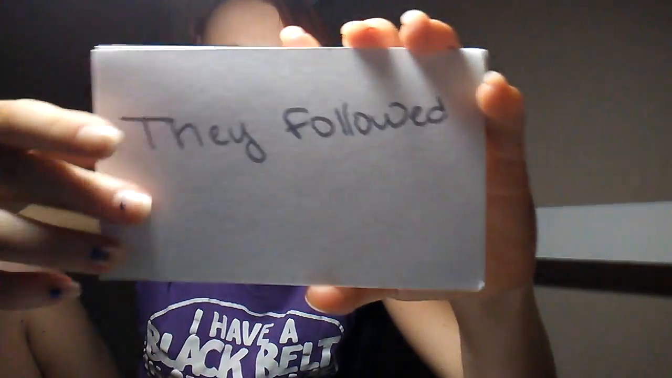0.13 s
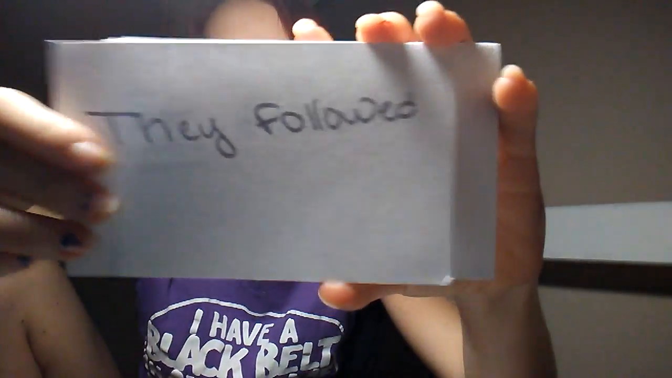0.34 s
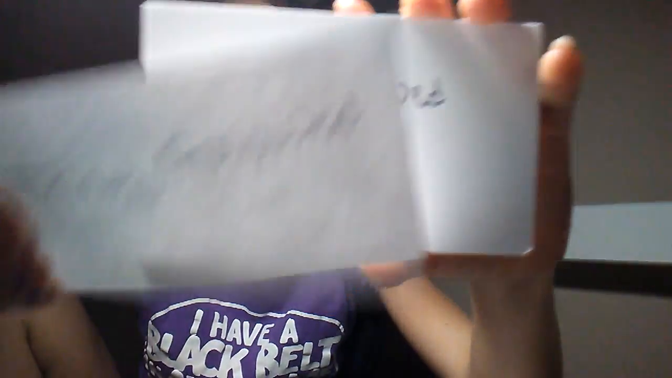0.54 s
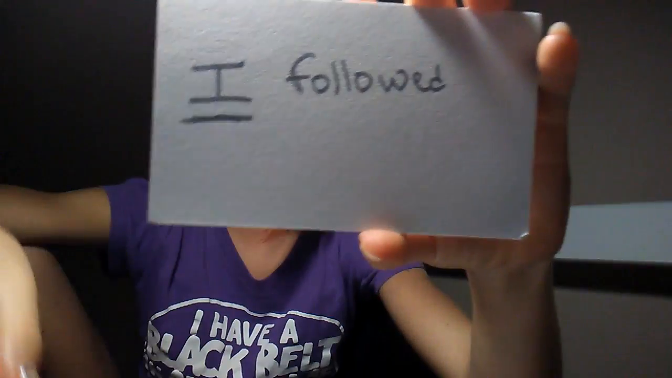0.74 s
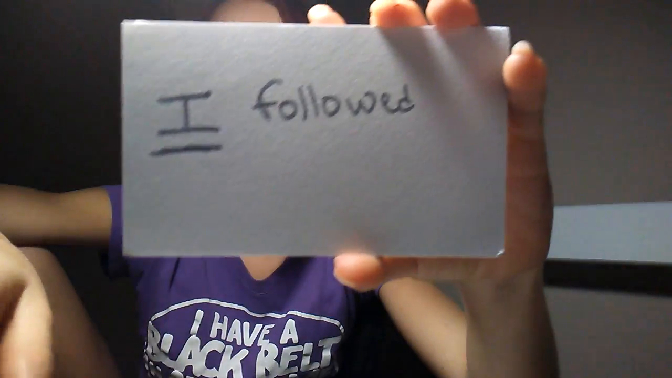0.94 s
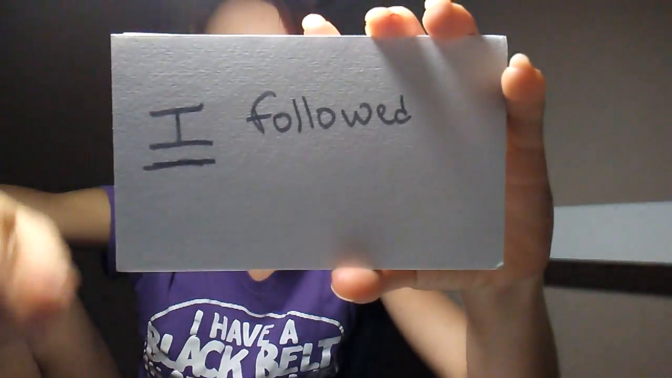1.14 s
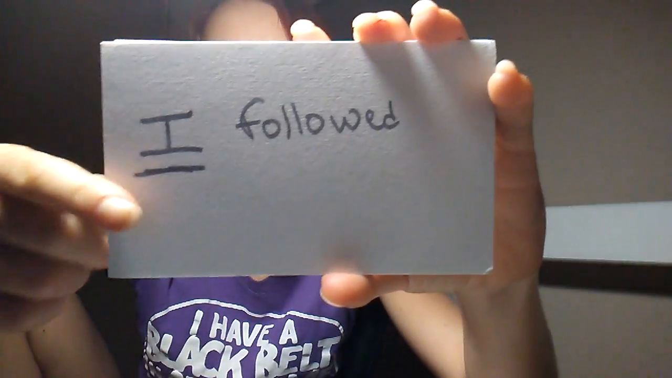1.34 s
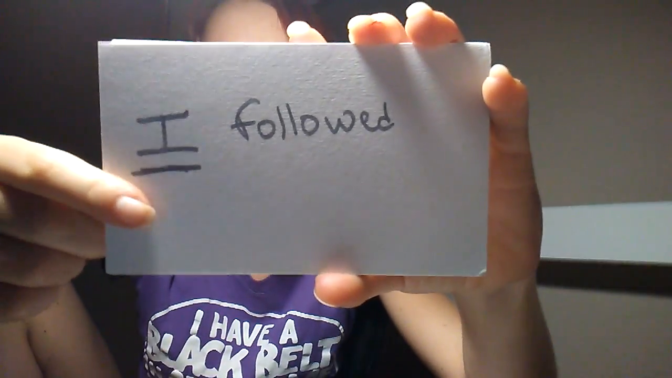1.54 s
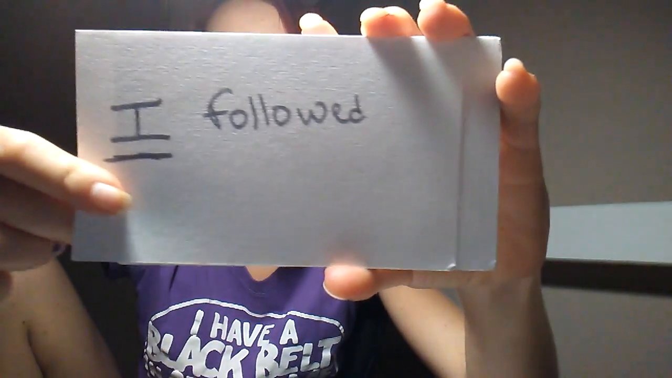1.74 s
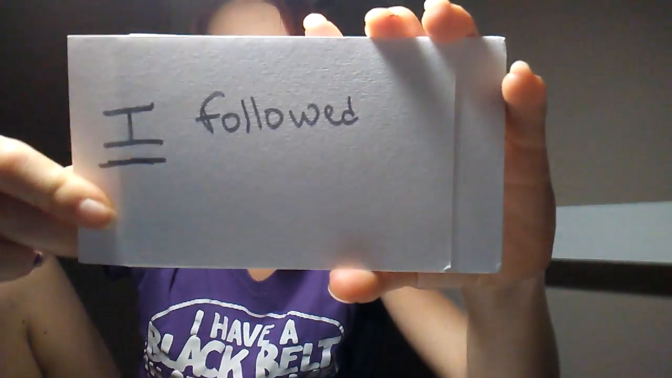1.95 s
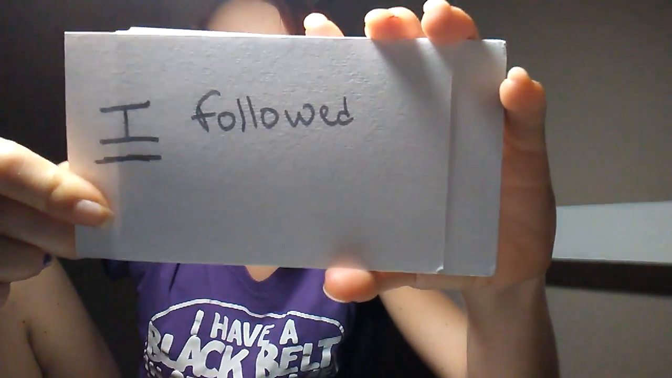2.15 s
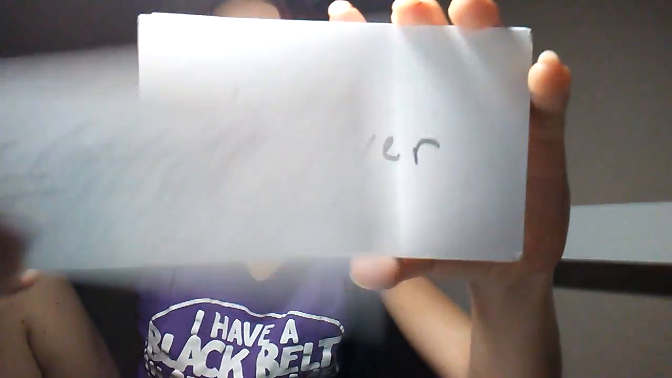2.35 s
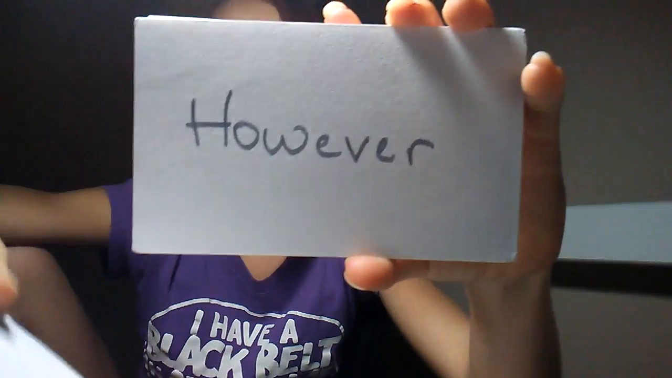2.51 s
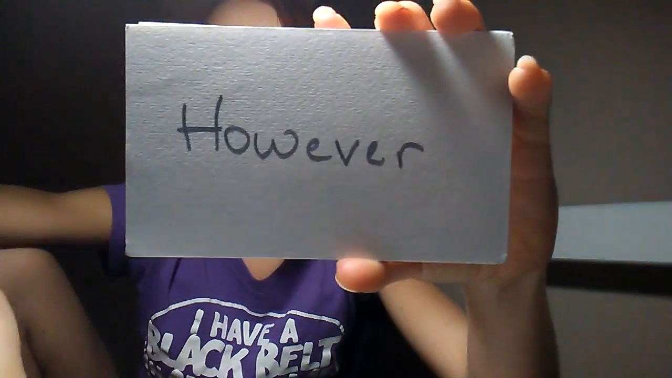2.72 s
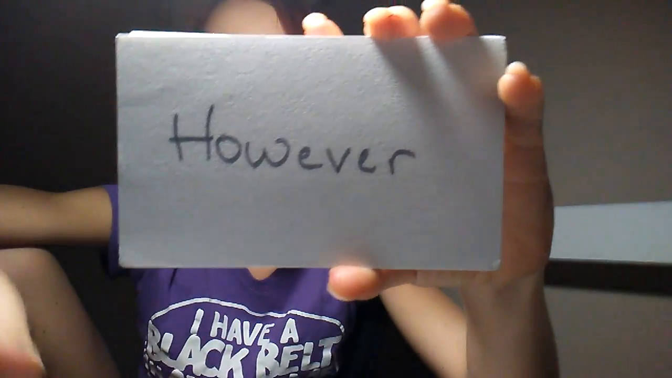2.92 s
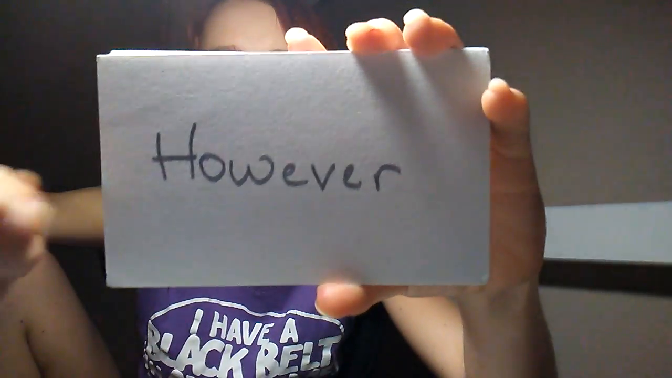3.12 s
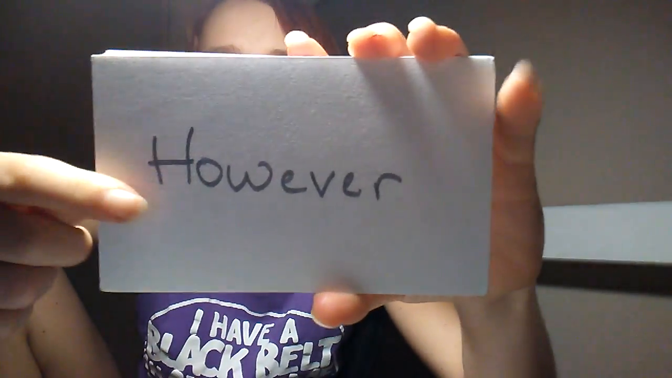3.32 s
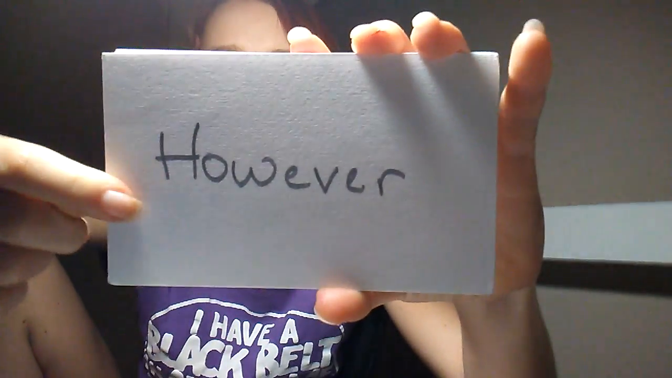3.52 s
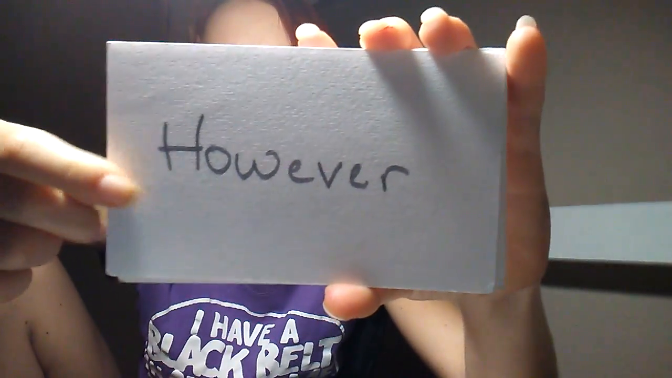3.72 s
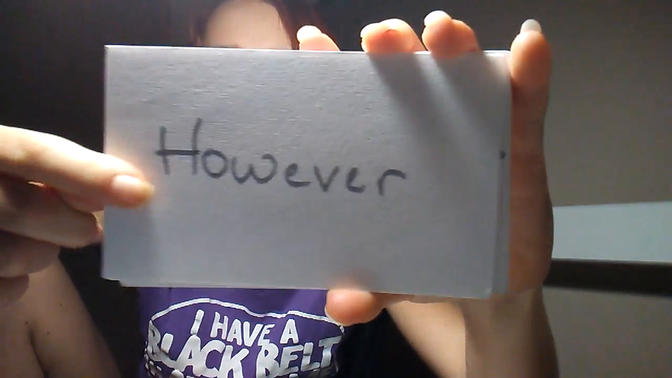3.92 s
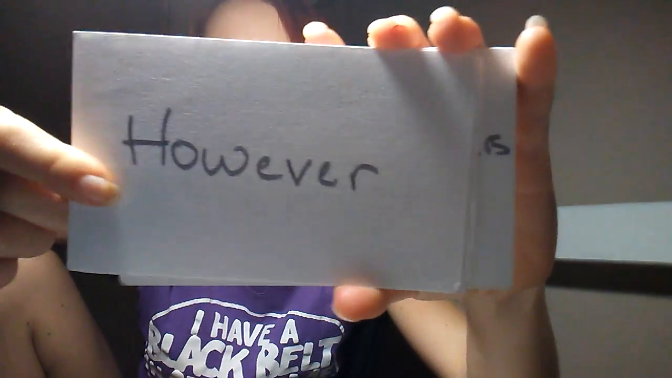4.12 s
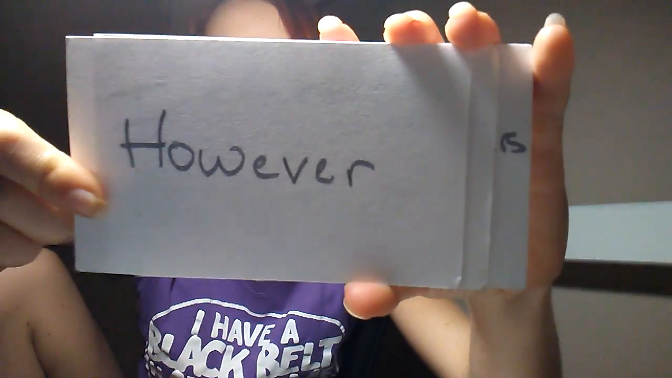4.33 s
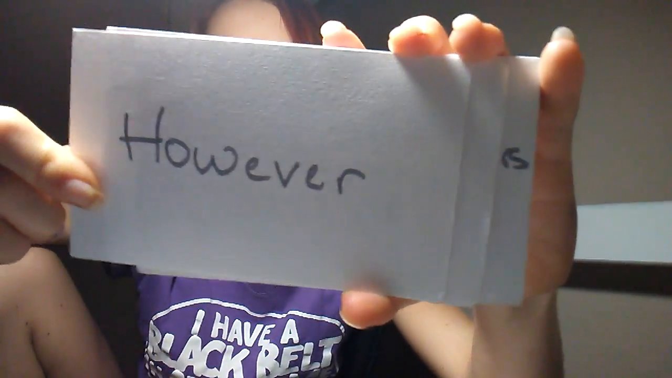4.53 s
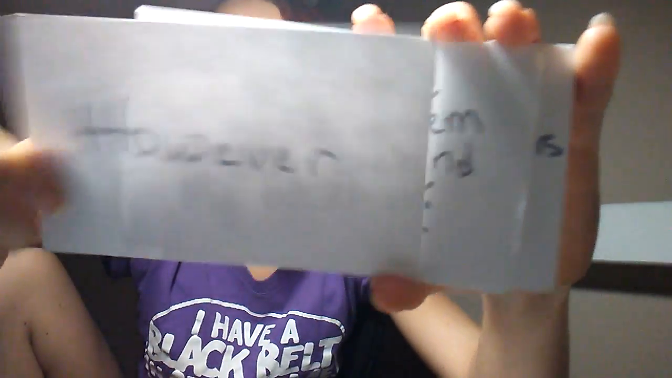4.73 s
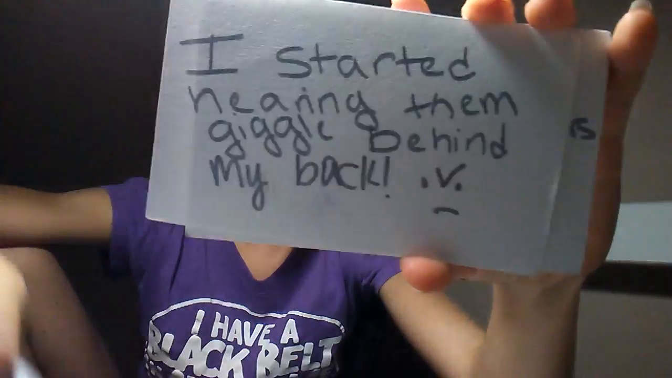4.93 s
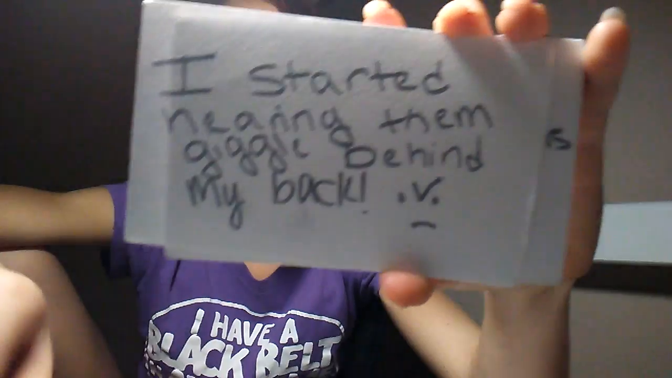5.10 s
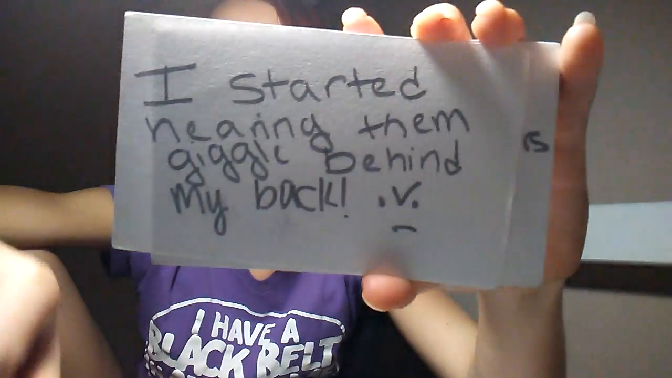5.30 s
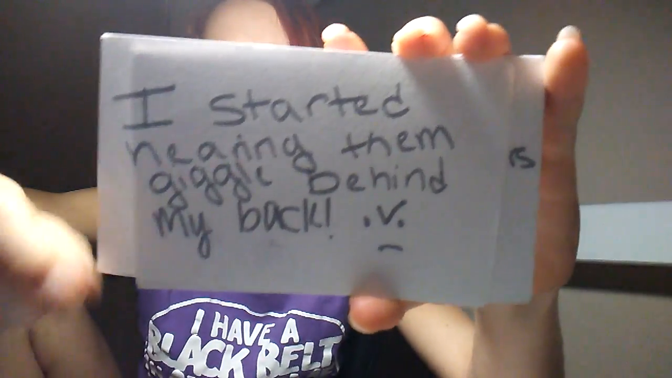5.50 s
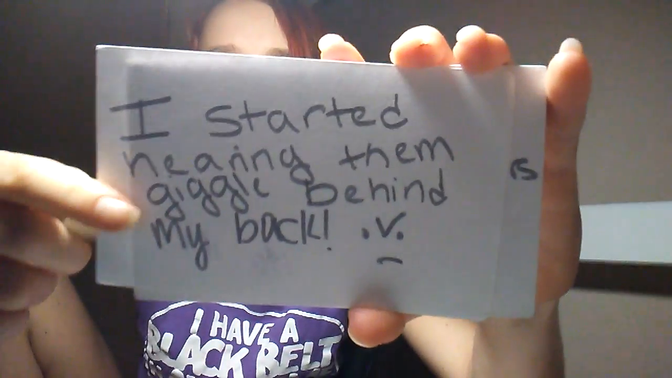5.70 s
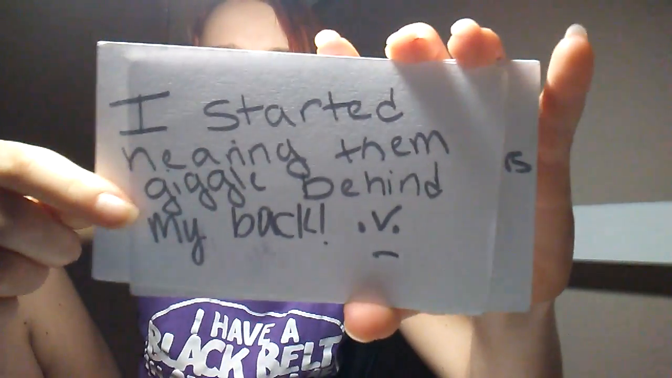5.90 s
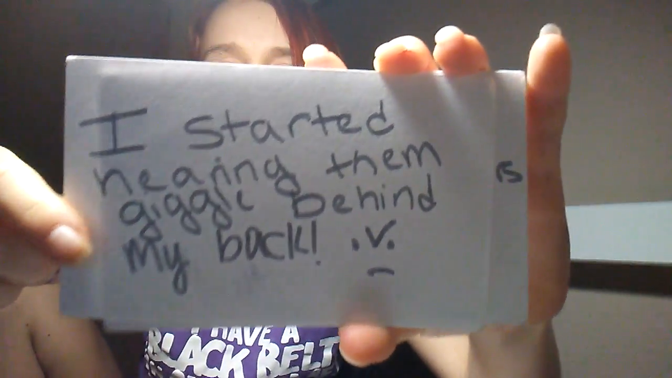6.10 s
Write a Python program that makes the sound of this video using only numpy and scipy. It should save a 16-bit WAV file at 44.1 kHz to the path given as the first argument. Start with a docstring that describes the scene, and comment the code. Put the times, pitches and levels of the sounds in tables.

```python
"""Paper cards are pulled off a hand-held stack close to a small microphone in a quiet room.
Soft drags lead to a cluster of snaps near 0.6 s; fainter slides follow, then swishes, flaps and low bumps
from 2.2 to 3.1 s, long soft drags, flicks near 4.4 s, a hard snap at 4.8 s, bumps and a last flick at 5.7 s.
Drags are shaped noise made of fibre slips; snaps and landings are damped modes set ringing by small pushes.
A low rumble, a short dense echo and a barely wavering hiss lie beneath."""
import sys
import numpy as np
from scipy import signal
from scipy.fft import rfft, irfft, next_fast_len
from scipy.io import wavfile
from scipy.ndimage import uniform_filter1d

SR = 44100
rng = np.random.default_rng(int(sys.argv[2]) if len(sys.argv) > 2 else 0)


def field_ratio(decibels):
    """Amplitude ratio for a level in dB (20 dB per decade); scalars and array-likes work."""
    return 10 ** (np.asarray(decibels, dtype=float) / 20)


def digitize_waveform(pressure):
    """Quantize a signal to 16-bit integers and store it at the path in sys.argv[1].

    Rows of a 2-D input are taken as channels; values are limited to [-1, 1].
    """
    field = np.atleast_2d(pressure).T
    bounded = np.clip(field, -1, 1)
    quanta = np.round(bounded * 32767).astype(np.int16)
    wavfile.write(sys.argv[1], SR, quanta)


N = 271347


def slides():
    """Stick-slip friction: dense fibre slips stutter as the grip catches, hiss and shake the card."""
    # Spectra of the hiss, coarse scrape, card body and top treble. Each row: frequency in Hz, density in dB per Hz.
    hiss_spectrum = [(3000, -33.5), (4400, -12), (5100, -3.5), (5800, 0), (6500, -1.5), (7200, -10),
                     (8200, -25), (15500, -49)]
    scrape_spectrum = [(1400, -14.5), (1950, -10), (2450, -12.5), (2900, -6.5), (3400, -8.5), (3900, -3.5),
                       (4500, -9), (5500, -14), (8000, -39.5)]
    body_spectrum = [(120, -2.5), (300, 2), (500, -1.5), (900, -2), (1400, -9.5), (1900, -9.5),
                     (2600, -18.5), (4000, -27.5)]
    air_spectrum = [(6500, -24.5), (7500, 1.5), (9000, -3.5), (12000, -5.5), (15500, -2)]
    hiss_db, hiss_hz = dragged(1, rest=-120), dragged(2, rest=5800)
    scrape_db, body_db = dragged(3, rest=-120), dragged(4, rest=-120)

    # top treble: -68.5 dB at a hiss of -56.5 dB, growing 0.54 dB for each dB of hiss
    air = field_ratio(-68.5 + 0.54 * (hiss_db + 56.5))
    held = field_ratio(-86.5 + 2.5 * drift(per_s=8.8))  # the fingers that hold the card shake it faintly
    # body noise is limited to -57 dB before stutter, so the snaps stand out
    body = np.minimum(field_ratio(body_db) + held, field_ratio(-57))

    catch_db, catches_per_s = 1.8, 450  # how hard and how often the grip catches
    stutter_db, stutters_per_s = 1, 70  # uneven pull
    hiss, scrape, body = [
        level * field_ratio(catch_db * drift(catches_per_s) + stutter_db * drift(stutters_per_s))
        for level in (field_ratio(hiss_db), field_ratio(scrape_db), body)]

    slips = fibres(per_s=9000, spread_db=1.5)
    narrow = sliding_resonance(slips, hiss_hz, width_hz=600)
    hissing = colour(hiss * slips, hiss_spectrum) + field_ratio(-9) * hiss * narrow
    scraping = colour(scrape * fibres(per_s=4000, spread_db=0.0), scrape_spectrum)
    shaking = colour(body * fibres(per_s=1500, spread_db=1.5), body_spectrum)
    return (patchy(hissing, patchy_db=3, size=8)
            + patchy(scraping + shaking, patchy_db=3.5, size=20)
            + colour(air * rng.standard_normal(N), air_spectrum))


def dragged(column, rest):
    """Control by interpolation: one setting of the drags over time; rest holds in the pauses between runs."""
    # Paper drags over paper, in runs of settings, broken at pauses and just before sharp onsets.
    # Each row: time in seconds, hiss level in dB, hiss resonance in Hz, coarse scrape level in dB,
    # card body level in dB.
    drag_runs = [
        [(0.111, -53.5, 5600, -84, -94), (0.125, -89, 5670, -84, -84), (0.153, -71, 5670, -85, -95),
         (0.161, -84, 5600, -79, -90), (0.245, -69.5, 5800, -82, -79), (0.253, -82, 5850, -87, -82),
         (0.283, -66, 5800, -83, -81), (0.3, -80, 5800, -75, -89)],
        [(0.303, -72, 5940, -80, -90), (0.31, -76, 5940, -83, -86), (0.33, -60, 5940, -77, -78),
         (0.352, -61, 5890, -73, -78), (0.362, -59, 5800, -76, -92), (0.372, -54, 5840, -70, -81),
         (0.392, -57, 5830, -72, -82), (0.412, -56, 5790, -62, -73)],
        [(0.64, -48.5, 5600, -43, -45), (0.652, -66, 5600, -60.5, -20), (0.672, -75, 5590, -72, -65),
         (0.698, -65.5, 5530, -68, -68), (0.724, -85, 5690, -78, -74), (0.762, -73.5, 5770, -78, -75),
         (0.88, -85, 5830, -85, -80)],
        [(1.685, -80, 5730, -92, -90), (1.689, -70, 5760, -85, -100), (1.753, -60, 5950, -74.5, -87),
         (1.791, -61.5, 5890, -69.5, -85), (1.827, -71, 5930, -74, -88), (1.879, -64.5, 5970, -80, -79),
         (1.945, -84, 5920, -89, -100)],
        [(2.23, -89, 5940, -81, -85.5), (2.264, -77, 5800, -78, -80), (2.298, -54.5, 5600, -64.5, -83),
         (2.324, -53, 5500, -61, -87), (2.336, -52.5, 5470, -58.5, -79), (2.35, -52, 5400, -59.5, -89),
         (2.376, -53, 5470, -59.5, -61), (2.38, -46, 5540, -57, -51)],
        [(2.698, -53, 5720, -64, -78), (2.71, -59, 5700, -55, -60), (2.72, -59.5, 5900, -58, -74),
         (2.774, -45, 6000, -50, -70), (2.788, -53, 5880, -51, -42)],
        [(3.07, -95, 5800, -95, -81), (3.11, -96, 5800, -95, -76.5), (3.2, -97, 5800, -93, -88)],
        [(3.6, -75, 5960, -67.5, -87), (3.618, -93, 5870, -91, -76), (3.656, -81, 5820, -86, -88),
         (3.728, -91, 5910, -94, -82), (3.756, -70, 5890, -80, -87), (3.79, -95, 5900, -92, -92)],
        [(3.99, -90, 6010, -92, -78), (3.998, -80, 6030, -79, -94), (4.068, -80, 5880, -85.5, -88),
         (4.106, -71.5, 5930, -77, -90), (4.166, -69.5, 5960, -82, -78), (4.242, -65, 5880, -74, -101),
         (4.256, -61.5, 5860, -75, -81), (4.316, -77, 5730, -82, -70)],
        [(4.58, -79, 5770, -90, -82), (4.616, -67.5, 5800, -79, -70), (4.646, -69.5, 5890, -72, -83),
         (4.682, -65.5, 5940, -77, -77), (4.704, -65, 5920, -70, -73), (4.76, -61.5, 5840, -71, -87),
         (4.784, -60, 5900, -71, -81), (4.792, -62, 5960, -65, -72)],
        [(5.165, -73, 5990, -73, -57), (5.181, -59, 5990, -58, -53), (5.191, -65, 5980, -66, -56),
         (5.219, -60.5, 5950, -61.5, -64), (5.251, -77, 5800, -77, -76), (5.289, -66, 5920, -71.5, -68),
         (5.415, -90, 5700, -93, -100)],
        [(0.0, -81, 5720, -80, -93), (0.04, -80, 5930, -81, -86), (0.068, -87, 5750, -85, -100),
         (0.106, -72, 5610, -72, -99)],
        [(0.418, -51, 5900, -55, -62), (0.456, -71.5, 5860, -78, -78), (0.482, -64, 5900, -68, -80.5),
         (0.521, -69, 5920, -72, -78)],
        [(0.527, -59, 5870, -65.5, -60), (0.541, -67, 5860, -66.5, -85), (0.583, -52, 5600, -66, -35.5)],
        [(0.598, -63, 5760, -58, -31), (0.608, -72, 5780, -74, -40), (0.636, -47.5, 5790, -49, -49)],
        [(0.895, -84, 5840, -79, -76), (0.907, -67, 5860, -81, -85), (0.919, -71, 5870, -89, -64),
         (0.924, -66, 5870, -78, -68)],
        [(0.93, -54.5, 6160, -60.5, -51), (0.944, -73, 6100, -75, -67), (0.978, -77, 6000, -78, -73),
         (1.021, -78, 5780, -81, -68)],
        [(1.027, -58.5, 6000, -60.5, -67), (1.037, -64, 5800, -69, -72), (1.153, -80.5, 5820, -87, -77),
         (1.165, -84, 5960, -85, -78)],
        [(1.172, -72.5, 6070, -72, -74), (1.234, -86, 5790, -94, -74), (1.262, -94, 5690, -91, -83),
         (1.28, -82, 5870, -85, -90)],
        [(1.966, -78, 5720, -77, -90), (1.978, -55.5, 5730, -58.5, -61), (2.02, -80, 5720, -81, -79),
         (2.1, -87, 5820, -81, -75)],
        [(2.384, -56, 5430, -52, -47), (2.402, -53, 5460, -47.5, -37), (2.442, -77, 5620, -74, -70.5),
         (2.52, -83, 5660, -81, -70.5)],
        [(2.581, -61.5, 5700, -67, -71), (2.595, -73, 5720, -72, -79), (2.615, -91, 5760, -79, -76),
         (2.64, -79, 5780, -78, -78)],
        [(2.683, -64, 5640, -79, -92), (2.694, -75, 5640, -84, -75)],
        [(2.792, -56, 5850, -48, -38), (2.799, -50, 5810, -53.5, -36), (2.85, -73, 5970, -70, -70),
         (2.98, -86, 5800, -84, -77)],
        [(4.323, -66, 5610, -77, -81), (4.337, -77, 5620, -85, -70), (4.366, -80, 5670, -83, -75)],
        [(4.37, -56, 5930, -69, -60), (4.388, -78, 5930, -82, -74), (4.414, -77, 5910, -81, -61)],
        [(4.417, -64, 5600, -61, -63), (4.437, -77, 5590, -75, -78), (4.465, -79, 5680, -79, -78),
         (4.57, -79, 5840, -84, -72.5)],
        [(4.794, -57, 5700, -53, -52), (4.818, -54, 5600, -59, -37), (4.838, -66, 5730, -71, -57),
         (4.92, -85, 5770, -80, -75)],
        [(5.009, -68, 5820, -60.5, -64), (5.023, -74, 5790, -77, -66.5), (5.037, -68, 5580, -69, -79),
         (5.056, -67, 5650, -60, -61)],
        [(5.059, -59, 6100, -56.5, -59), (5.077, -52, 6000, -57.5, -65), (5.125, -70.5, 5840, -70, -79),
         (5.16, -67, 5780, -76, -76)],
        [(5.6, -76, 5830, -90, -78), (5.64, -82, 5890, -82, -80), (5.652, -76, 5930, -76, -77),
         (5.666, -90, 5970, -75, -69)],
        [(5.673, -57.5, 5600, -77, -66), (5.701, -97, 5810, -80, -82.5), (5.743, -85, 5770, -81, -79),
         (5.8, -86, 5750, -96, -92)],
    ]
    pause_s = 0.03  # runs closer than this are joined
    t, runs = np.arange(N) / SR, sorted(drag_runs)
    rows = np.concatenate(runs)
    out = np.interp(t, rows[:, 0], rows[:, column])
    for before, after in zip(runs, runs[1:] + [[(np.inf,)]]):
        if after[0][0] - before[-1][0] > pause_s:
            out[(t > before[-1][0]) & (t < after[0][0])] = rest
    return out


def fibres(per_s, spread_db):
    """Shot noise: tiny fibre slips at random times, of random sign and of sizes spread by spread_db."""
    size = field_ratio(spread_db * np.minimum(rng.exponential(1, N), 5)) * rng.choice([-1., 1.], N)
    return evened(size * (rng.random(N) < per_s / SR))


def patchy(x, patchy_db, size):
    """Shifting resonance: as the card shifts in the hand, narrow patches of the spectrum come and go briefly."""
    z = signal.stft(x, nperseg=256, noverlap=192)[2]
    noise = rng.standard_normal(z.shape[::-1])
    in_time = uniform_filter1d(noise, size=size, axis=0)  # frames of 64 samples
    patches = uniform_filter1d(in_time, size=2, axis=1)
    return signal.istft(z * field_ratio(patchy_db * evened(patches).T), nperseg=256, noverlap=192)[1][:N]


def sliding_resonance(x, hz, width_hz):
    """Heterodyne resonance: x is shifted down by the moving pitch hz, low-passed and shifted back; rms 1."""
    turn = np.exp(2j * np.pi * np.cumsum(hz) / SR)
    r = np.exp(-np.pi * width_hz / SR)
    return evened((turn * signal.lfilter([1], [1, -2 * r, r * r], x / turn)).real)


def snaps():
    """Modal ringing: buckles excite the bending modes of the card, ticks the modes of its edge."""
    # The card buckles, high where a small part gives way, low where all of it swings.
    # Each row: start in seconds, peak in dB before the filters, pitch in Hz, decay of the burst in seconds.
    buckle_rows = [(0.414, -49.5, 336, 0.0044), (.526, -46, 1170, 0.0046), (0.562, -41.5, 364, 0.018),
                   (.561, -38.5, 880, 0.018), (0.5825, -31.5, 430, 0.0073), (.583, -23, 800, 0.01),
                   (.5905, -19.5, 918, 0.02), (.594, -19.5, 1795, 0.01), (0.596, -26.5, 450, 0.0064),
                   (0.593, -40, 3170, .004), (.598, -29, 2650, 0.0045), (.61, -32, 990, 0.0094),
                   (.596, -22.5, 1390, 0.0071), (.64, -33, 1920, 0.014), (.646, -33.5, 900, 0.0082),
                   (0.907, -46.5, 454, 0.013), (.934, -46, 1080, 0.016), (1.026, -56.5, 494, 0.017),
                   (1.079, -56.5, 490, 0.017), (1.173, -51.5, 1050, 0.01), (1.185, -57.5, 745, 0.005),
                   (1.976, -44, 1940, 0.0032), (1.98, -34, 1770, 0.0051), (2.26, -59, 886, 0.035),
                   (2.383, -40, 336, 0.0066), (2.385, -34, 1120, 0.0063), (2.394, -33, 924, 0.014),
                   (2.392, -38, 321, 0.005), (2.406, -53, 3800, 0.0036), (2.418, -43, 930, 0.0038),
                   (2.41, -37.5, 313, 0.013), (2.578, -57, 1910, .004), (2.699, -57, 1930, 0.016),
                   (2.703, -61, 4280, 0.0074), (2.716, -50, 1850, .012), (2.74, -45, 3100, .01),
                   (2.783, -43, 560, .004), (2.789, -36, 420, 0.0037), (2.7905, -30.5, 950, 0.0023),
                   (2.796, -27.5, 535, 0.01), (2.793, -31.5, 1760, 0.0041), (2.799, -29, 251, 0.011),
                   (3.0695, -59, 460, 0.002), (3.07, -63.5, 900, .002), (3.544, -57, 1231, 0.0037),
                   (3.585, -59, 1730, .004), (4.271, -58, 705, 0.013), (4.3225, -64, 890, 0.002),
                   (4.366, -54, 257, 0.0087), (4.368, -51.5, 900, 0.002), (4.414, -50, 277, 0.0091),
                   (4.416, -41.5, 1225, 0.0016), (4.794, -48, 556, 0.0065), (4.797, -42.5, 980, 0.004),
                   (4.812, -35, 620, 0.0089), (4.813, -20, 1983, 0.0062), (4.8135, -25, 1217, 0.0071),
                   (4.815, -26.5, 3850, 0.0044), (4.817, -31.5, 405, 0.0026), (4.8195, -27.5, 245, 0.001),
                   (4.834, -43, 340, 0.012), (4.844, -40, 1850, 0.02), (5.0095, -50.5, 647, 0.0032),
                   (5.019, -46.5, 535, 0.0092), (5.035, -48.5, 606, 0.0072), (5.047, -46, 497, 0.0048),
                   (5.058, -47.5, 614, 0.019), (5.065, -45, 960, 0.024), (5.074, -40, 3700, .01),
                   (5.169, -51, 716, 0.033), (5.184, -49.5, 755, 0.015), (5.198, -52, 510, 0.0085),
                   (5.213, -53, 670, .01), (5.673, -42, 2500, 0.0069), (5.674, -51, 1120, 0.0032)]
    # Modes of the bent card. Each row: multiple of the pitch, level in dB,
    # cycles until 60 dB down (for pitches of 1 kHz and above).
    card_modes = [(.62, -12, 39.5), (.8, 2.5, 16), (1.01, 11, 18.5), (1.2, -15.5, 23.5), (1.45, 0.5, 19),
                  (1.9, -2, 24), (2.5, -36, 17.5)]
    # An edge flicks past a finger or the next card. Each row: start in seconds, peak in dB before the filters.
    tick_rows = [(0.1105, -48), (0.4162, -36), (.5253, -55), (0.64, -34), (0.929, -40), (1.0271, -49),
                 (1.968, -51), (1.9814, -42), (2.383, -41), (2.393, -40), (2.403, -36), (2.583, -56),
                 (2.6845, -56), (2.701, -42), (3.749, -54), (4.3228, -53), (4.368, -35.5), (4.4177, -33.5),
                 (4.795, -37), (5.009, -64), (5.059, -44), (5.1783, -59), (5.672, -54)]
    # Modes of the edge. Each row: nominal frequency in Hz, level in dB, time until 60 dB down in seconds.
    edge_modes = [(4320, -12, 0.0024), (5050, 2.5, 0.0043), (5930, 1.5, 0.0055), (6400, -5.5, 0.0045)]

    # low swings lose more of their motion in each cycle than a buckle at 1 kHz
    buckles = pitched(buckle_rows, card_modes, rise_cycles=0.35, ring_with_pitch=0.62)
    buckles = signal.sosfilt(signal.butter(2, 4500, fs=SR, output="sos"), buckles)  # soft paper, dull top
    ticks = np.zeros(N)
    for s, db in tick_rows:
        add(ticks, s, field_ratio(db) * ring(edge_modes, length=0.002, rise=0.00015))
    ticks = signal.sosfilt(signal.butter(4, 7400, fs=SR, output="sos"), ticks)
    # a small card radiates little bass
    return signal.sosfilt(signal.butter(2, 130, "high", fs=SR, output="sos"), buckles + ticks)


def pitched(events, shape, rise_cycles, ring_with_pitch):
    """Modal scaling: each event rings the same pattern of modes at its own pitch."""
    out = np.zeros(N)
    for s, db, hz, length in events:
        lasting = min(hz / 1000, 1) ** ring_with_pitch
        modes = [(multiple * hz, mode_db, lasting * cycles / (multiple * hz))
                 for multiple, mode_db, cycles in shape]
        add(out, s, field_ratio(db) * ring(modes, length, rise=rise_cycles / hz))
    return out


def ring(modes, length, rise):
    """Impulse response: one push and a dying patter of smaller ones ring damped modes; the peak is 1."""
    t = np.arange(8192) / SR
    when, size, bend = rng.random((3, len(t)))
    patter = (when < 900 / SR) * (2 * size - 1)  # 900 pushes per second on average
    push = 0.65 * patter * np.exp(-t / length)
    push[0] = 1
    detune = 1 + 0.064 * (bend - .5)  # no two bends are alike
    tap = sum(field_ratio(db - 60 * t / t60) * np.sin(2 * np.pi * hz * d * t)
              for (hz, db, t60), d in zip(modes, detune))
    softened = tap * (1 - np.exp(-t / rise)) ** 2  # paper gives way softly
    out = signal.fftconvolve(push, softened)
    return out / abs(out).max()


def bumps():
    """Impact and resonance: thumps ring the desk over a lumpy rumble that slides to the pitch of each thump."""
    # A card or hand lands on the desk. Each row: start in seconds, peak in dB, pitch in Hz.
    thump_rows = [(.418, -58.5, 79.4), (0.565, -55, 184.2), (0.656, -46.5, 144.2), (2.307, -63.5, 126.6),
                  (2.387, -48, 174.3), (2.464, -45, 170), (2.745, -52, 159.5), (2.807, -37.5, 157.4),
                  (2.884, -50.5, 125), (2.902, -40.5, 68), (3.069, -54.5, 180.5), (3.083, -45.5, 88),
                  (3.104, -50.5, 73.4), (4.815, -39, 142), (5.042, -65.5, 151.3), (5.17, -58.5, 134),
                  (5.232, -49, 66.4), (5.276, -50, 75.4), (5.309, -59, 79), (5.39, -59, 85.5)]
    # Modes of the desk. Each row: multiple of the pitch, level in dB, cycles until 60 dB down.
    desk_modes = [(0.701, -11, 18), (1.011, -1, 13), (1.599, -22, 8)]
    # Low rumble between thumps. Each row: time in seconds, level in dB.
    rumble_rows = [(0, -73), (.2, -71), (.8, -78.5), (1.1, -72.5), (1.6, -75.5), (2.1, -76.5), (2.6, -77.5),
                   (3.2, -69.5), (3.649, -68), (3.95, -77.5), (4.07, -73), (4.3, -76.5), (5., -72.5),
                   (5.449, -69.5), (5.749, -73), (5.999, -74), (6.15, -67)]
    # Spectrum of the wide part of the rumble. Each row: frequency in Hz, density in dB per Hz.
    rumble_spectrum = [(30, -51.5), (50, 7), (65, 9), (110, 5.5), (170, 6), (300, -5.5), (600, -35.5)]
    thump_s = 0.013  # decay of the patter of a landing
    shudder_db, shudder_s = -5.5, 0.059  # rumble stirred up: level against the thump, fall time
    calm_hz, top_db = 83.7, -59.5  # resonance between thumps; the rumble swells no higher than this

    s, db = np.transpose(rumble_rows)
    calm = field_ratio(np.interp(np.arange(N) / SR, s, db) + 1 * drift(per_s=17))  # lumps of 1 dB
    stirred = [swell(s + thump_s, 2 * thump_s, shudder_s, db + shudder_db, bend=0.92)
               for s, db, _ in thump_rows]
    level = calm + sum(stirred)
    # each resonance counts by its share of the level
    hz = (calm * calm_hz + sum(gain * row[2] for gain, row in zip(stirred, thump_rows))) / level
    wide = colour(rng.standard_normal(N), rumble_spectrum)
    tuned = sliding_resonance(rng.standard_normal(N), hz, width_hz=70)
    rumble = np.minimum(level, field_ratio(top_db)) * evened(tuned + 0.83 * wide)

    landings = [(s, db, pitch, thump_s) for s, db, pitch in thump_rows]
    return rumble + pitched(landings, desk_modes, rise_cycles=0.096, ring_with_pitch=0)


def swell(s, rise, fall, db, bend):
    """Transient envelope: a gain that climbs smoothly to db at time s and dies away again."""
    edge_db = -30.5  # change from the top, one rise before it and one fall after it
    t = np.arange(N) / SR - s
    on = slice(*np.searchsorted(t, [-2 * rise, 5 * fall]))
    shape = np.where(t[on] < 0, (t[on] / rise) ** 2, abs(t[on] / fall) ** bend)
    out = np.zeros(N)
    out[on] = field_ratio(db + edge_db * shape)
    return out


def room(x):
    """Diffuse reverberation: dense echoes of random sign die away exponentially."""
    t60 = 0.14  # seconds until 60 dB down
    at = np.arange(120, SR // 2, 8)  # samples
    taps = np.zeros(SR // 2 + 8)
    decay = field_ratio(-60 * at / SR / t60)
    taps[at + rng.integers(0, 8, len(at))] = rng.choice([-1., 1.], len(at)) * decay
    return signal.fftconvolve(x, taps / np.linalg.norm(taps))[:N]


def background():
    """Filtered noise: the coloured hiss of room and microphone wavers slowly by about a decibel."""
    # Spectrum of the hiss. Each row: frequency in Hz, density in dB per Hz.
    floor_spectrum = [(35, -47), (60, -37.5), (113, -0.5), (232, -4.5), (549, -4.5), (661, -8.5),
                      (1430, -13), (2800, -15), (8980, -21.5), (14600, -17.5), (15700, -17)]
    waver_db = 0.8 * drift(per_s=2)
    return field_ratio(-71 + waver_db) * colour(rng.standard_normal(N), floor_spectrum)


def evened(x):
    """Power normalisation: scales to rms 1."""
    return x / np.sqrt(np.mean(x ** 2) + 1e-20)


def colour(x, points):
    """Linear filtering: shapes x by a spectrum of (Hz, dB) points, keeping the level of white noise."""
    hz, db = np.transpose(points)
    size = next_fast_len(len(x))
    f = np.fft.rfftfreq(size, 1 / SR)
    gain = evened(field_ratio(np.interp(np.log(f + 1), np.log(hz + 1), db)))
    return irfft(rfft(x, size) * gain, size)[:len(x)]


def drift(per_s):
    """Low-passed noise: slow chance of rms 1 that changes about per_s times a second."""
    width = int(SR / per_s)
    return evened(uniform_filter1d(uniform_filter1d(rng.standard_normal(N), width), width))


def add(mix, s, sound):
    """Superposition: adds a sound at time s in seconds."""
    part = mix[round(s * SR):][:len(sound)]
    part += sound[:len(part)]


def scene():
    """Superposition of the cards, their echo, the bumps and the hiss of room and microphone."""
    cards = slides() + snaps()
    echo = field_ratio(-20) * room(cards)
    return (cards + echo + bumps() + background())[None]


def band_limit(x):
    """A steep low-pass at the top of the band."""
    return signal.sosfilt(signal.butter(12, 15850, fs=SR, output="sos"), x)


def record(dry):
    """Band limiting: a bass cut at 52 Hz and a steep treble limit at 15.8 kHz, then a small constant offset."""
    cut = signal.sosfilt(signal.butter(4, 52, "high", fs=SR, output="sos"), dry)
    limited = signal.sosfilt(signal.ellip(10, .3, 70, 15800, fs=SR, output="sos"), cut)
    return band_limit(limited - .0004)


dry = scene()
out = record(dry)
digitize_waveform(out)
```